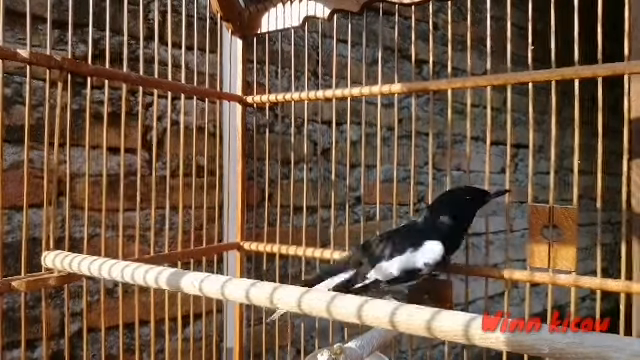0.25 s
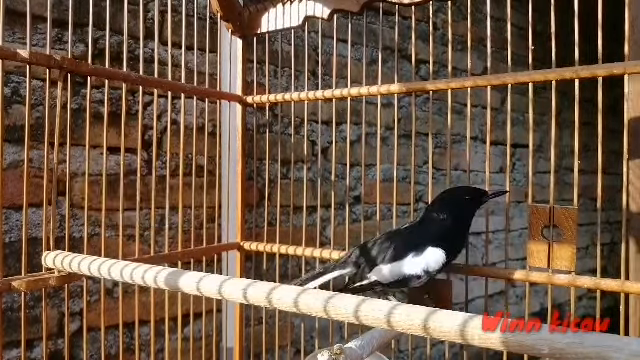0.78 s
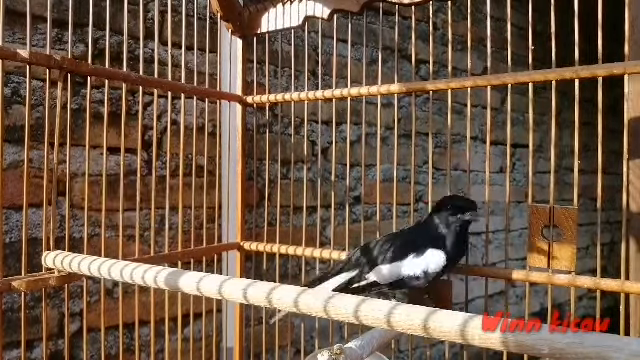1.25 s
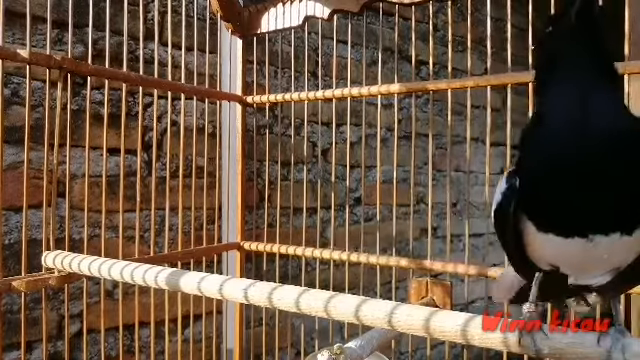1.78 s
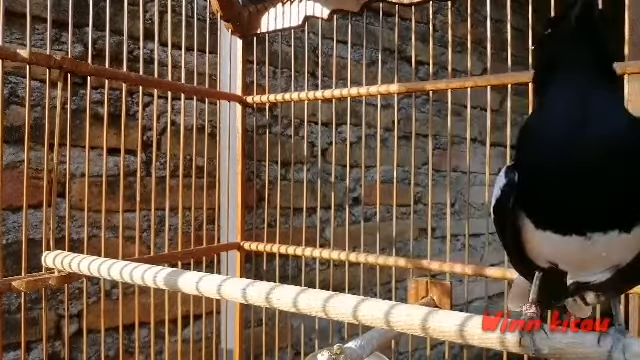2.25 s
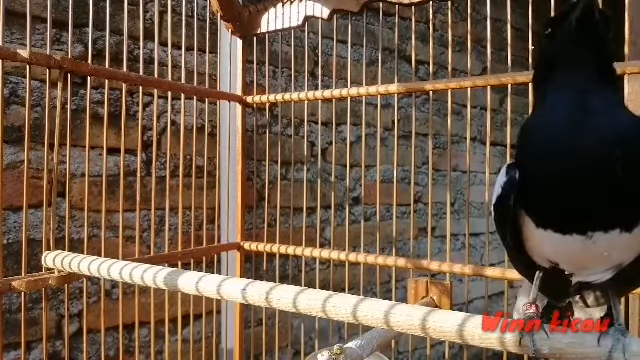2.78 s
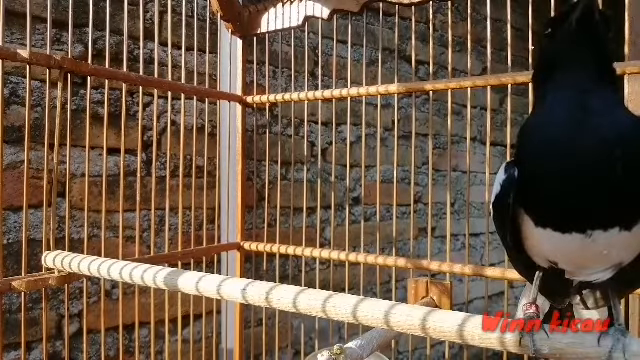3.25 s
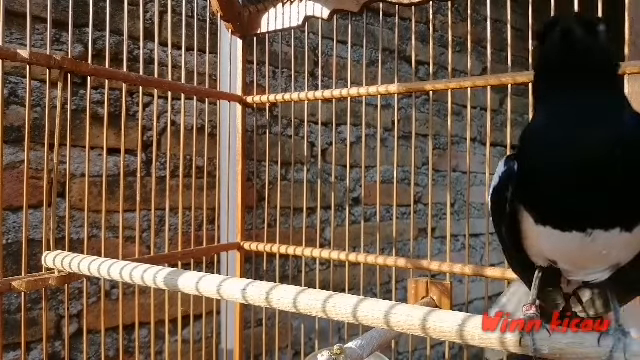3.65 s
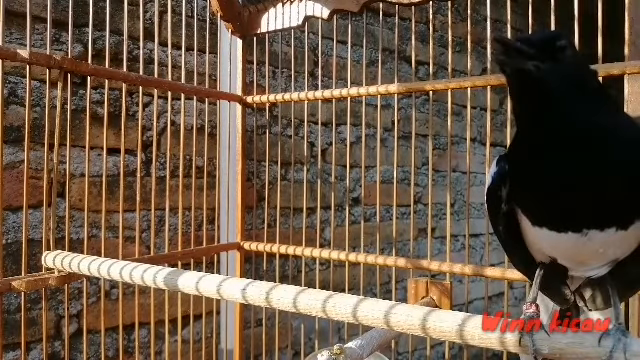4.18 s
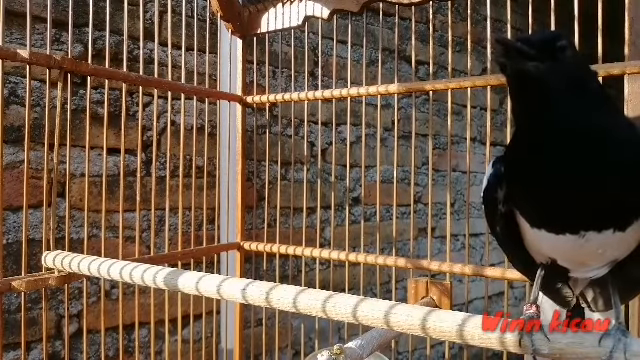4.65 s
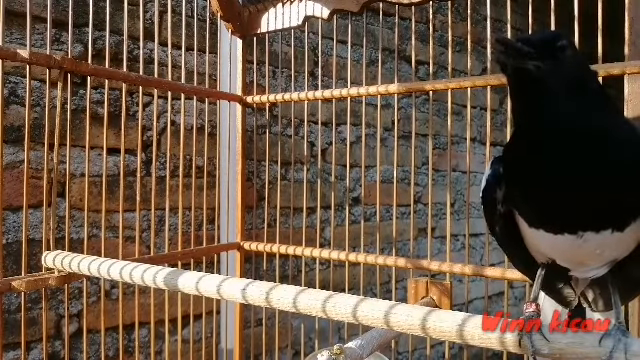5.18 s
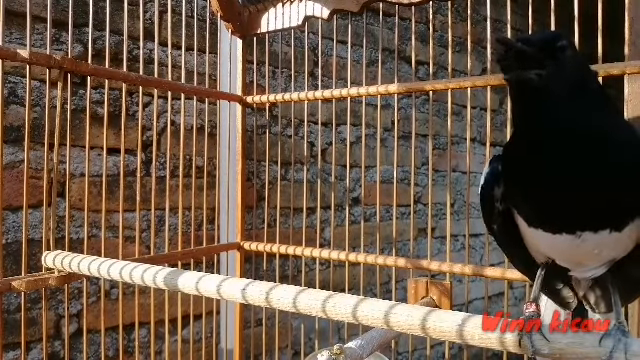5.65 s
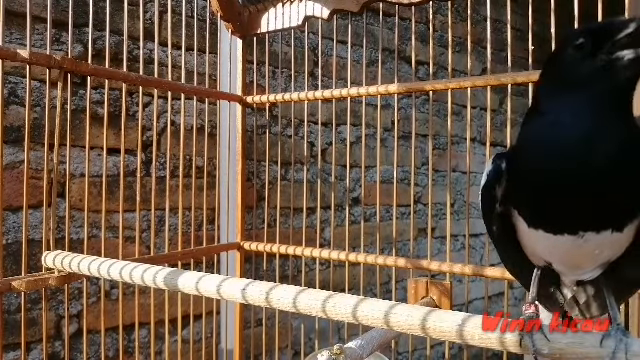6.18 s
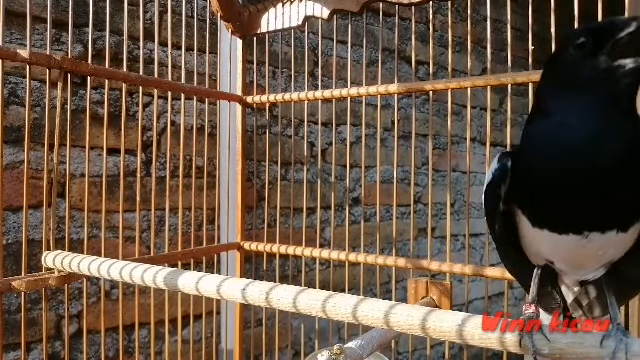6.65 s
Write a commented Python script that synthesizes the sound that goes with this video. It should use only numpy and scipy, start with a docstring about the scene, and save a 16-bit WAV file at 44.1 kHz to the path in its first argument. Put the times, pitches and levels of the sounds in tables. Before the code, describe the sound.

Faint peeps and thin two-part bird calls over a distant muttering engine, then a caged songbird bursts into loud, close slurred whistles amid chirps.

```python
"""Throughout, a small engine mutters in bouts some way off over the low rush of a street.
Soft peeps open, then a neighbour's "tsee-chew" calls; a harsh rasp and hoarse slurs follow.
Then a magpie-robin, caged by a brick wall, sings loud slurred whistles close by, amid twitter.
Voices are gliding sines, the rasp is pulsed noise in throat resonances, the engine is a sum of
harmonics; street and air are banded noise, and a few ticks are short noise bursts."""
import sys
import numpy as np
from scipy import signal
from scipy.io import wavfile
from scipy.ndimage import uniform_filter1d, minimum_filter1d, map_coordinates

SR = 44100
rng = np.random.default_rng(int(sys.argv[2]) if len(sys.argv) > 2 else 0)


def unload_audio(sound):
    """Save the sound as a 16-bit wav file, at the path given as the first command line argument."""
    columns = np.transpose(np.atleast_2d(sound))
    # keep every value between -1 and 1, then stretch to whole-number steps
    steps = np.round(np.clip(columns, -1, 1) * 32767)
    wavfile.write(sys.argv[1], SR, steps.astype(np.int16))


N = 304719
TIME = np.arange(N) / SR

# singer's short slurred notes: t/s, length/s, pitch/Hz at start, 1/3, 2/3 and end,
# scoop/Hz, drop/Hz, attack/s, level/dB, swell/dB, overtones/dB
SONG_ARCS = [(4.196, 0.13, 3370, 3539, 3281, 2928, 120, 140, 0.02, -8, -3, -23.5),
             (4.415, 0.14, 2980, 3191, 3085, 2900, 250, 1, 0.022, -9.5, -4.5, -35),
             (4.59, 0.16, 3010, 3095, 3099, 2963, 180, 280, 0.014, -9, -1, -22.5),
             (4.87, 0.073, 2660, 2920, 2994, 3010, 300, 300, 0.0093, -9, 11, -26),
             (5.168, 0.069, 2520, 2485, 2734, 2744, 550, 220, 0.019, -3.5, 11, -28),
             (6.292, .068, 4266, 4167, 4245, 3980, 1.4, 1860, 0.0011, -8.5, 8.5, -24.5),
             (6.672, 0.082, 3946, 3794, 3496, 3660, 260, 250, 0.0019, -7.5, -3, -21),
             (6.763, 0.11, 3680, 3352, 3076, 3040, 160, 130, 0.0017, -8.5, -3.5, -24)]
# pitch shake of the other birds, as a share of pitch
PEEP_WAVER, CHIRP_WAVER = .012, .03


def from_db(db):
    """Decibels to gain."""
    return 10 ** (np.asarray(db) / 20)


def rms_one(x):
    """Scale to rms 1."""
    return x / np.sqrt(np.mean(x ** 2) + 1e-20)


def in_time(rows, t=TIME):
    """Columns of a curve, interpolated at the times t."""
    s, *columns = np.transpose(rows)
    return [np.interp(t, s, c) for c in columns]


def at_hz(points, hz):
    """Read a spectrum on a log-frequency axis."""
    points = np.array(points)
    return np.interp(np.log(hz), np.log(points[:, 0]), points[:, 1])


def drift(rate_hz, t=TIME):
    """Smooth random curve: unit-spread steps at rate_hz, spline-interpolated at t."""
    steps = rng.standard_normal(8192)
    return map_coordinates(steps, [(t - t[0]) * rate_hz], order=3, mode="wrap")


def span(start_s, end_s):
    """Sample times between two moments."""
    return TIME[max(int(start_s * SR), 0):int(end_s * SR)]


def add(out, t, sound):
    """Mix a sound in at its times."""
    first = round(t[0] * SR)
    out[..., first:first + len(t)] += sound


def fade(t, length_s):
    """Rounded opening and closing of a note."""
    to_edge_s = np.minimum(t - t[0], t[-1] - t)
    return np.sin(np.pi / 2 * np.clip(to_edge_s / length_s, 0, 1)) ** 2


def turn(hz):
    """Phase of a moving pitch."""
    return 2 * np.pi * np.cumsum(hz) / SR


def arc(pitches_hz, along):
    """Smooth polynomial glide through evenly spaced pitches; along runs from 0 to 1."""
    count = len(pitches_hz)
    return np.polyval(np.polyfit(np.linspace(0, 1, count), pitches_hz, count - 1), along)


def panned(pan_db):
    """Left and right gains of constant power; positive favours the left."""
    gains = from_db(np.array([[.5], [-.5]]) * pan_db)
    return gains / np.sqrt(np.mean(gains ** 2, axis=0))


def bandpass(x, low_hz, high_hz):
    """Butterworth band."""
    sos = signal.butter(2, [low_hz, high_hz], "band", fs=SR, output="sos")
    return signal.sosfilt(sos, x)


def resonate(x, modes):
    """Parallel resonances with steep skirts; modes: f/Hz, width/Hz, gain/dB."""
    return sum(from_db(db) * bandpass(x + 1e-18, hz - width / 2, hz + width / 2)
               for hz, width, db in modes)


def singer():
    """The song: short arcs, long falls that flatten and fade, and drawn-out whistles."""
    out = np.zeros((2, N))
    for row in SONG_ARCS:
        start, length, *pitches_hz, scoop_hz, drop_hz, attack_s, db, swell_db, overtones_db = row
        t = span(start, start + length)
        along = (t - start) / length
        level_db = db + swell_db * (along - .5)
        hz = arc(pitches_hz, along)
        add(out, t, whistle(t, hz, level_db, scoop_hz, drop_hz, attack_s, overtones_db))

    # drawn-out whistles: t/s, pitch/Hz, level/dB
    held = [(3.645, 3013, -18.5), (3.705, 3260, -13.5), (3.76, 3190, -20), (3.87, 3080, -13),
            (4.03, 3113, -11.5), (4.075, 3315, -11), (4.122, 3874, -12.5)]
    wavy = [(5.512, 4210, -11.5), (5.545, 3435, -6.5), (5.59, 3407, -8.5), (5.67, 3561, -6),
            (5.715, 3538, -6), (5.775, 3248, -10)]
    climbing = [(5.855, 2510, -19.5), (5.885, 2650, -7), (5.908, 2960, -5.5), (5.945, 3510, -9),
                (5.985, 3656, -6.5), (6.08, 3782, -8), (6.22, 3941, -8)]
    quavering = [(6.457, 4030, -7.5), (6.5, 4177, -9.5), (6.612, 4241, -9.5), (6.638, 3920, -4),
                 (6.671, 3716, -9)]
    # long falls, begun by one side of the syrinx while the other ends a rising note:
    # t/s, pitch/Hz, level/dB
    steep_fall = [(4.923, 4620, -17.5), (4.94, 4250, -10.5), (4.956, 3300, -6), (4.982, 3033, -7.5),
                  (5.005, 2690, -14), (5.05, 2390, -16.5), (5.107, 2214, -21.5)]
    even_fall = [(5.219, 4160, -5.5), (5.234, 3960, -7.5), (5.25, 3356, -6), (5.29, 2933, -8),
                 (5.328, 2590, -14), (5.417, 2147, -23)]
    # curve, scoop/Hz, drop/Hz, overtones/dB
    long_notes = [(held, 950, 900, -40), (steep_fall, 0, 570, -30.5), (even_fall, 0, 410, -33.5),
                  (wavy, 510, 0, -22), (climbing, 860, 640, -21.5), (quavering, 270, 0, -25.5)]
    for curve, scoop_hz, drop_hz, overtones_db in long_notes:
        t = span(curve[0][0], curve[-1][0])
        hz, level_db = in_time(curve, t)
        add(out, t, whistle(t, hz, level_db, scoop_hz, drop_hz, .014, overtones_db))
    return out


def bend(edge_s, depth_hz):
    """Pitch deficit edge_s from a note's edge, as fast as the syrinx can tighten and slacken."""
    bend_hz_per_s2 = 2500000
    return np.maximum(np.sqrt(abs(depth_hz)) - np.sqrt(bend_hz_per_s2) * edge_s, 0) ** 2


def vibrato(t, start_s=6.513, end_s=6.64, swell_s=.032, depth_hz=140, rate_hz=114):
    """Pitch swing in Hz of the song's one burst of fast vibrato."""
    depth = np.clip(np.minimum(t - start_s, end_s - t) / swell_s, 0, 1)
    return depth_hz * depth * np.sin(2 * np.pi * rate_hz * (t - t[0]))


def whistle(t, hz, db, scoop_hz, drop_hz, attack_s, overtones_db):
    """One nearly pure note with weak harmonics, reaching the left side a little late."""
    # singer's direction: t/s, lag of the left side/ms
    left_lag = [(5.6, .042), (6.05, .103)]
    # wall echo cancels the song on one side, by pitch: f/Hz, left-right/dB
    balance = [(2300, -8), (2700, -17.5), (3050, -5), (3420, -0.5), (3540, -12), (3700, 0.5), (4000, -8),
               (10000, -7.5), (12500, 2.5)]
    tremble_hz, tear_s = 7, .0003
    edge_db, release_s = 19.5, .0062
    third_db, third_follows, third_db_per_octave = -32.5, .33, 12
    brightens, flutter_db = .44, 1.5  # overtone dB per dB of level; own flicker
    shimmer_db, vibrato_db_per_hz = 1.0, .012

    since, until = t - t[0], t[-1] - t
    hz = uniform_filter1d(hz, size=250, mode="nearest")
    hz = hz - bend(since, scoop_hz) - bend(until, drop_hz)
    # fast glides tear the tone
    torn_hz = tear_s * np.gradient(hz) * SR * drift(3000, t)
    swing_hz = vibrato(t)
    hz = hz + swing_hz + tremble_hz * drift(300, t)
    lag_s = in_time(left_lag, t)[0] / 1000 * [[1], [0]]
    phase = turn(hz + torn_hz) - 2 * np.pi * hz * lag_s

    # the bill opens wider on high notes and lets more of the third harmonic out
    above_mean_db = overtones_db - np.mean([row[-1] for row in SONG_ARCS])
    upper_db = third_db + third_follows * above_mean_db + third_db_per_octave * np.log2(hz / 3400)
    tone = np.sin(phase) * panned(at_hz(balance, hz))
    for k, partial_db in enumerate((overtones_db, upper_db), 2):
        gain_db = partial_db + brightens * (db - np.mean(db)) + flutter_db * drift(32, t)
        tone += from_db(gain_db) * np.sin(k * phase) * panned(at_hz(balance, k * hz))

    edges_db = edge_db * (np.exp(-since / attack_s) + np.exp(-until / release_s))
    level = from_db(db - edges_db + shimmer_db * drift(190, t) - vibrato_db_per_hz * swing_hz)
    return np.sqrt(2) * level * fade(t, .002) * tone


def neighbour(scoop_hz=300, overtone_db=-40):
    """Each call is a thin whistle that catches and sags, then a hoarse downslur; returns both parts."""
    # "tsee-chew" calls: t/s, whistle length/s, sag/Hz, level/dB
    calls = [(0.678, 0.083, 395, -38), (1.033, 0.12, 153, -37), (1.408, .13, 212, -37),
             (1.853, 0.14, 201, -36.5), (2.301, .13, 49.5, -33)]
    call_hz, chew_db, chew_waver = 4837, -39.5, .04
    # the whistle starts faintly, catches, and sinks back
    catch_s, catch_rise_s, catch_decay_s = .028, .0058, .02
    lead_in_db, catch_db = 1, 15.5
    whistles, chews = np.zeros((2, N))
    for start, length, sag_hz, whistle_db in calls:
        top_hz, end_hz = call_hz + sag_hz / 2, call_hz - sag_hz / 2
        t = span(start, start + length)
        along = (t - start) / length
        hz = np.interp(along, [0, .2, .7], [top_hz - scoop_hz, top_hz, end_hz]) + 20 * drift(280, t)
        caught = t - start - catch_s
        surge = np.clip(caught / catch_rise_s, 0, 1) / (1 + (caught / catch_decay_s) ** 2)
        db = whistle_db + lead_in_db + (catch_db - lead_in_db) * surge
        add(whistles, t, np.sqrt(2) * from_db(db) * fade(t, .029) * np.sin(turn(hz)))
        end = start + length
        add(chews, *slur(end - .006, .095, (4700, 3850, 2700), chew_db + 2, chew_waver, overtone_db))
        # the bill opens partway down and lets the octave out
        add(chews, *slur(end + .028, .066, (8100, 6350, 5100), chew_db, CHIRP_WAVER, overtone_db))
    return whistles, chews


def slur(start, length, pitches_hz, db, waver, overtone_db, swing_hz=0):
    """One glide; an unsteady membrane makes it hoarse, a fast swing makes it buzz."""
    buzz_rate_hz, broken_db = 110, 3.0
    t = span(start, start + length)
    unsteady = .8 * drift(900, t) + .5 * drift(200, t)
    hz = arc(pitches_hz, (t - start) / length) * (1 + waver * unsteady)
    hz = hz + swing_hz * np.sin(2 * np.pi * buzz_rate_hz * (t - start))
    phase = turn(hz)
    level = from_db(db + broken_db * drift(150, t))
    tone = np.sin(phase) + from_db(overtone_db) * np.sin(2 * phase)
    return t, np.sqrt(2) * level * fade(t, length / 6) * tone


def slurs(rows, waver, overtone_db, swing_hz=0):
    """A table of gliding notes."""
    out = np.zeros(N)
    for start, length, *pitches_hz, db in rows:
        add(out, *slur(start, length, pitches_hz, db, waver, overtone_db, swing_hz))
    return out


def hoarse_notes():
    """Slurs roughened by a strongly shaking pitch, and one buzzy arched note."""
    # both: t/s, length/s, start/Hz, middle/Hz, end/Hz, level/dB
    hoarse = [(2.985, 0.04, 2570, 2960, 3760, -38.5), (3.08, 0.095, 2470, 2420, 1953, -33),
              (3.16, 0.049, 1980, 1650, 1430, -43.5), (4.552, 0.031, 2800, 2230, 1471, -39),
              (4.99, 0.099, 3050, 3550, 3780, -32.5), (6.35, 0.096, 3900, 4200, 4094, -37),
              (6.415, 0.075, 2100, 1950, 1850, -45.5)]
    buzz = (.415, .135, 4000, 4450, 3500, -36)
    rough = slurs(hoarse, waver=.06, overtone_db=-32)
    return rough + slurs([buzz], CHIRP_WAVER, overtone_db=-40, swing_hz=230)


def twitter(overtone_db=-38, octave_db=6):
    """Rough rising chirps, soft peeps and reedy low peeps, each a bowed glide."""
    # a second singer's chirps: t/s, length/s, top/Hz, bow/Hz, level/dB
    # bow > 0 rises onto a ledge, bow < 0 rises ever faster
    chirp_rows = [(3.665, 0.047, 4330, 201.5, -30.5), (3.65, 0.021, 7520, -200, -34.5),
                  (3.708, 0.026, 7520, -500, -37.5), (3.872, 0.017, 7350, 0.5, -41.5),
                  (3.881, 0.057, 4680, 140, -29), (3.95, 0.033, 5360, 9, -30),
                  (4.211, 0.04, 5800, -200, -30), (4.397, .038, 4430, 200.5, -29.5),
                  (4.432, 0.025, 5430, 154, -29.5), (4.599, 0.054, 4430, 196, -32),
                  (4.711, .03, 4720, 198, -32.5), (4.83, 0.048, 4860, -88, -26.5)]
    # soft peeps: t/s, length/s, start/Hz, end/Hz, level/dB
    peep_rows = [(0, 0.039, 3070, 3305, -38), (0.07, 0.039, 4660, 3870, -41.5),
                 (0.591, 0.1, 2865, 3204, -47.5), (3.471, 0.22, 3840, 3970, -49),
                 (3.642, 0.026, 4750, 5480, -40), (3.728, 0.027, 6130, 6170, -36),
                 (4.139, 0.086, 3990, 4166, -36.5), (4.466, 0.12, 5580, 6070, -40),
                 (4.572, 0.045, 3500, 3660, -24.5), (4.796, 0.03, 6380, 3440, -31),
                 (5.401, 0.089, 4460, 5030, -43.5)]
    # low peeps with a strong octave: t/s, length/s, start/Hz, end/Hz, level/dB
    reedy_rows = [(.132, 0.038, 2496, 2306, -47.5), (0.669, 0.034, 2490, 2670, -51),
                  (.886, 0.035, 2420, 2316, -51.5)]
    chirp_start_hz, peep_bow_hz = 3820, 50
    chirps = [(s, length, chirp_start_hz, (chirp_start_hz + top) / 2 + bow_hz, top, db)
              for s, length, top, bow_hz, db in chirp_rows]

    def bowed(rows):
        """Add a raised middle pitch to each peep."""
        return [(s, length, first, (first + last) / 2 + peep_bow_hz, last, db)
                for s, length, first, last, db in rows]

    return (slurs(chirps, CHIRP_WAVER, overtone_db)
            + slurs(bowed(peep_rows), PEEP_WAVER, overtone_db)
            + slurs(bowed(reedy_rows), PEEP_WAVER, octave_db))


def rasp(pulse_hz=230, unevenness=.16, sharpness=.56):
    """Uneven puffs of turbulent air ring the throat."""
    # effort: t/s, level/dB
    effort = [(2.982, -59), (3.018, -31), (3.075, -32.5), (3.19, -60)]
    # throat resonances: f/Hz, width/Hz, gain/dB
    throat = [(3200, 1000, 0.5), (4440, 640, 12), (5380, 370, 5), (6840, 740, -2.5)]
    t, out = span(effort[0][0], effort[-1][0]), np.zeros(N)
    phase = turn(pulse_hz * (1 + unevenness * drift(198, t)))
    puffs = np.abs(np.sin(phase / 2)) ** sharpness
    air = resonate(puffs * rng.standard_normal(len(t)), throat)
    add(out, t, from_db(in_time(effort, t)[0]) * rms_one(air))
    return out


def ticks(t60_s=.16):
    """Short decaying noise bursts in one broad resonance."""
    # t/s, level/dB
    tick_rows = [(0.08, -43.5), (1.579, -39), (6.34, -32)]
    out = np.zeros(N)
    for start, db in tick_rows:
        t = span(start, start + .092)
        level = from_db(db - 60 * (t - start) / t60_s)
        add(out, t, level * fade(t, .0038) * rng.standard_normal(len(t)))
    return resonate(out, [(5580, 9000, .0095)])


def far_hoots():
    """A far bird's low hoots, slow glides placed to the left."""
    # t/s, length/s, start/Hz, middle/Hz, end/Hz, level/dB
    hoots = [(3.6, 0.241, 590, 604, 582, -43), (4.11, .13, 776, 765, 757, -48.5)]
    return slurs(hoots, PEEP_WAVER, overtone_db=-26.0) * panned(17)


def yard(x, t60_s, dull_hz, echoes_per_s):
    """Scattered echoes from cage and walls, different on each side, dying away."""
    t = TIME[:SR]
    arrives = rng.random((2, len(t))) < echoes_per_s / SR
    signs = rng.choice([-1, 1], (2, len(t)))
    echoes = arrives * signs * from_db(-60 * t / t60_s) * (t > .003)
    dulling = signal.butter(1, min(dull_hz, SR / 3), fs=SR, output="sos")
    echoes = signal.sosfilt(dulling, echoes + 1e-18)
    unit_energy = rms_one(echoes) / np.sqrt(len(t))
    return signal.fftconvolve(x[None], unit_energy, axes=1)[:, :N]


def engine(wobble=.003, uneven_db=3.0):
    """Harmonics of the firing cycle, each swelling with its part of the exhaust."""
    # unsteady idle: t/s, cycle rate/Hz
    rate = [(2.17, 32), (2.7, 30.4), (4.4, 29.4), (6.4, 30.5)]
    phase = turn(in_time(rate)[0] * (1 + wobble * drift(10)))
    boom, drone, growl = exhaust()
    orders_db = (boom, drone - 7, drone - 1, growl - 2, growl - 4, growl - 19, growl - 15, growl - 14)
    out = np.zeros(N)
    for order, db in enumerate(orders_db, 2):
        level = np.sqrt(2) * from_db(db + uneven_db * drift(19))
        out += level * np.sin(order * phase + rng.uniform(0, 3.12))
    return out


def exhaust(idle_db=-57.5, rise_db_per_s=56.5, fall_db_per_s=47):
    """Levels in dB of the engine's low, middle and upper harmonics, louder in bouts."""
    # start/s, end/s, low/dB, middle/dB, upper/dB
    bouts = [(0, 0.695, -49.5, -48, -54.5), (1.466, 2.108, -50.5, -43.5, -48.5),
             (2.254, 2.836, -49, -38, -43), (2.96, 3.635, -45, -37.5, -50), (4.5, 4.6, -46.5, -56.5, -59),
             (5.179, 6.248, -40.5, -59, -42), (6.393, 6.904, -60, -63.5, -45.5)]
    levels_db = [np.array(levels)[:, None] + swell(start, end, rise_db_per_s, fall_db_per_s)
                 for start, end, *levels in bouts]
    return np.maximum(np.max(levels_db, axis=0), idle_db)


def swell(start, end, rise_db_per_s, fall_db_per_s):
    """Level in dB that ramps to 0 at start, holds, and sinks after end."""
    return -rise_db_per_s * np.maximum(start - TIME, 0) - fall_db_per_s * np.maximum(TIME - end, 0)


def street():
    """Distant traffic: banded noise in overlapping swells."""
    # peak t/s, level/dB, rise/(dB/s), fall/(dB/s)
    swells = [(.3, -38, 18, 13), (.72, -44.5, -1, 44), (2.15, -46, 18, 9.5), (2.86, -43, 16, 96),
              (4.18, -43.5, 28, 10.5), (4.88, -41.5, 28.5, 45), (5.88, -40.5, 38, 11), (6.42, -41, 15, 23)]
    # f/Hz, density/dB per Hz
    street_spectrum = [(200, -3), (320, 4), (450, 2), (720, -3.5), (1000, -20.5), (2500, -24), (11000, -46)]
    level_db = np.max([db + swell(s, s, rise, fall) for s, db, rise, fall in swells], axis=0)
    return from_db(level_db) * banded_noise(street_spectrum, patchy_db=3.0)


def still_air():
    """Steady background noise, plus a thin narrow hiss."""
    # f/Hz, density/dB per Hz
    air_spectrum = [(25, -5.5), (130, 4.5), (300, -28), (900, -24.5), (3000, -27), (7000, -33.5),
                    (8800, -42.5), (15000, -61.5)]
    air = from_db(-45.0) * banded_noise(air_spectrum, patchy_db=4.0)
    hiss = rms_one(resonate(rng.standard_normal((2, N)), [(6950, 560, 0)]))
    return air + from_db(-70.0) * hiss


def banded_noise(spectrum, patchy_db):
    """Half-octave bands of stereo noise, each flickering on its own; rms 1."""
    # f/Hz, left-right correlation
    likeness = [(100, 0.26), (280, 0.36), (550, 0.042), (2000, 0.34)]
    out, edges_hz = 0, 20 * 2 ** np.arange(0, 10, .5)
    white = rng.standard_normal((2, 2, N))
    coarse = TIME[::100]
    for k, (low, high) in enumerate(zip(edges_hz, edges_hz[1:])):
        mid, side = bandpass(white[k % 2], low, high)
        hz = np.sqrt(low * high)
        alike = np.clip(at_hz(likeness, hz), -1, 1)
        flicker = np.interp(TIME, coarse, drift(14, coarse))
        gain = from_db(at_hz(spectrum, hz) + patchy_db * flicker)
        out = out + gain * (np.sqrt(1 + alike) * mid + np.sqrt(1 - alike) * side * [[1], [-1]])
    return rms_one(out)


def scene():
    """The singer is close and dry; the other birds come with more of the yard."""
    song = singer()
    # nearby bars and wall ripple the sweeps, the yard leaves a faint tail
    bars = from_db(-28) * yard(song[1], t60_s=.04, dull_hz=9000, echoes_per_s=900)
    tail = from_db(-28) * yard(song[1], t60_s=.3, dull_hz=8000, echoes_per_s=900)
    near = song + bars + tail

    whistles, chews = neighbour()
    others = chews + twitter() + rasp() + ticks() + hoarse_notes()
    sent = from_db(-11) * whistles + from_db(-6) * others
    echoes = yard(sent, t60_s=.26, dull_hz=8000, echoes_per_s=700)
    direct = whistles + from_db(-3.5) * others
    # off to the right, so late on the left
    left_lag_s = .00042
    late = np.roll(direct, int(left_lag_s * SR))
    around = (np.array([late, direct]) + echoes) * panned(-6.0)
    return near + around + far_hoots() + engine() + street() + still_air()


def record(dry):
    """A limiter holds the loudest notes to full scale; the top is cut."""
    cutoff_hz = 15500
    headroom = 1 / np.maximum(np.abs(dry).max(axis=0), 1)
    gain = uniform_filter1d(minimum_filter1d(headroom, size=301), size=301)
    lowpass = signal.ellip(8, .1, 80, cutoff_hz, fs=SR, output="sos")
    return signal.sosfilt(lowpass, dry * gain)


dry = scene()
out = record(dry)
unload_audio(out)
```